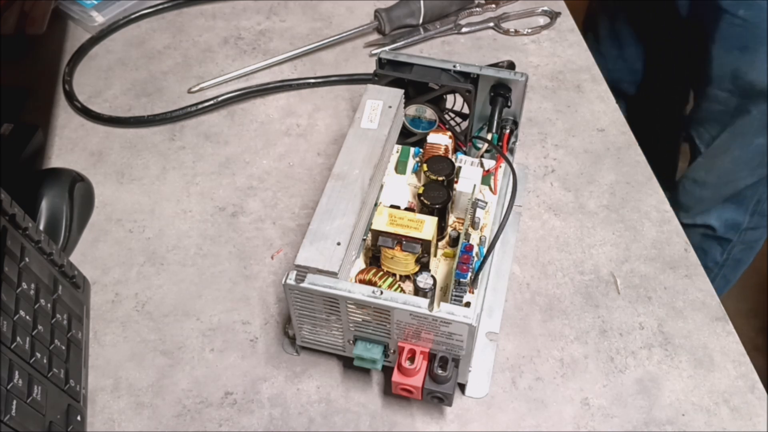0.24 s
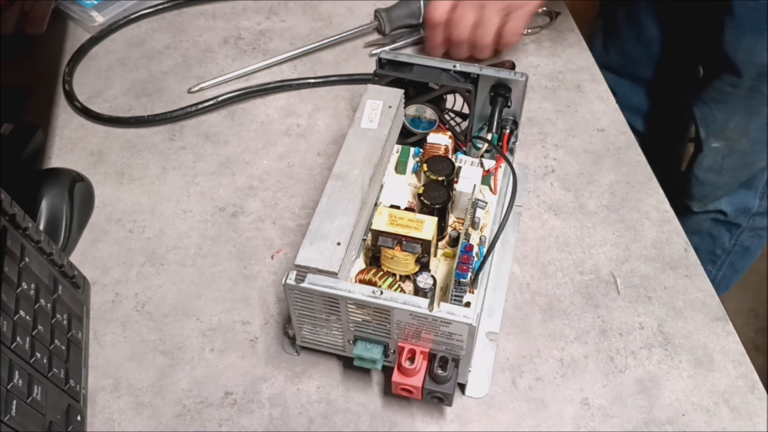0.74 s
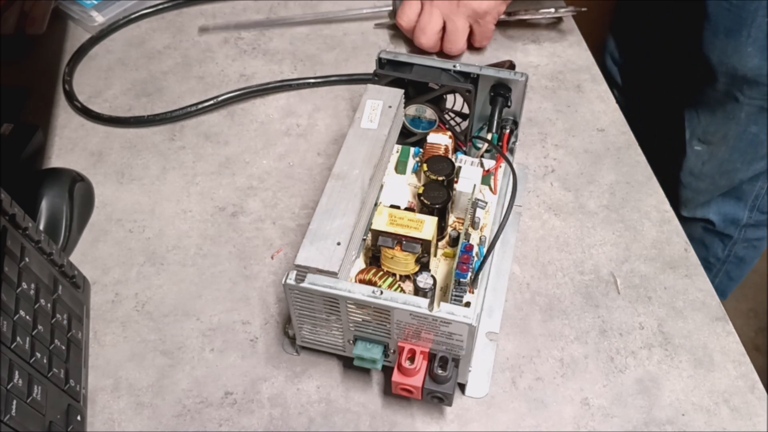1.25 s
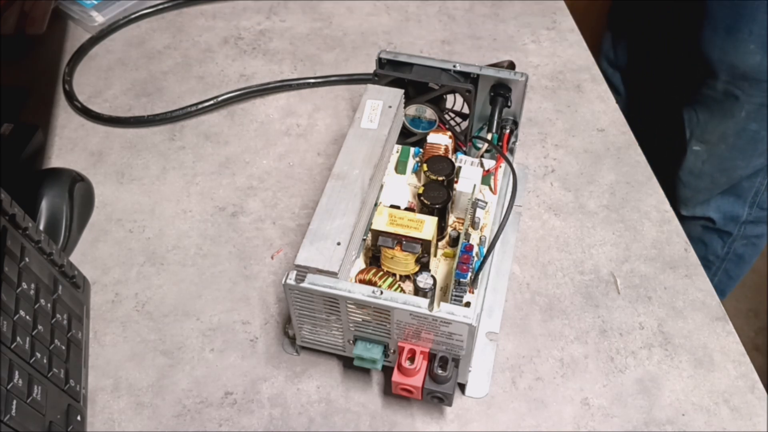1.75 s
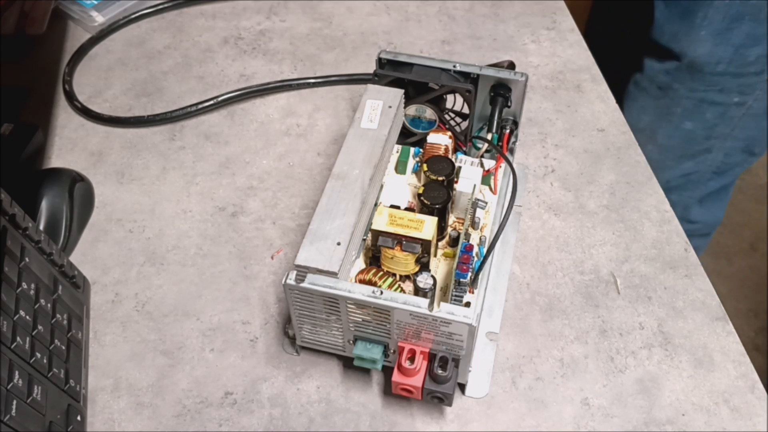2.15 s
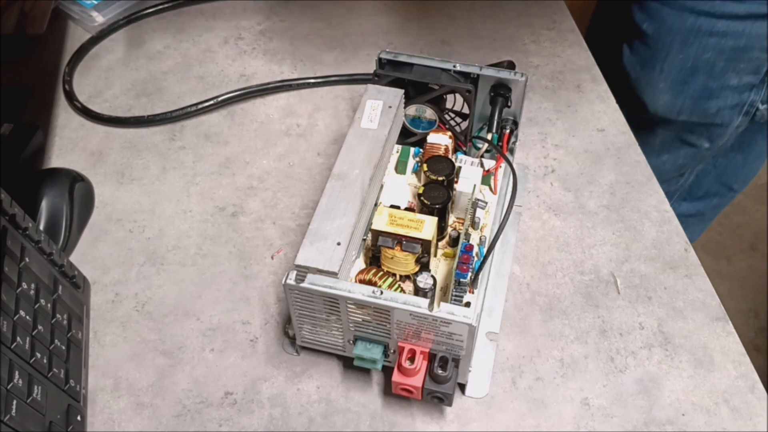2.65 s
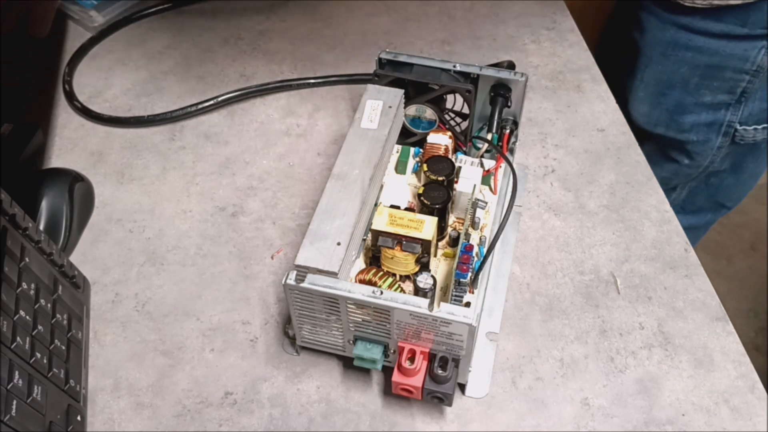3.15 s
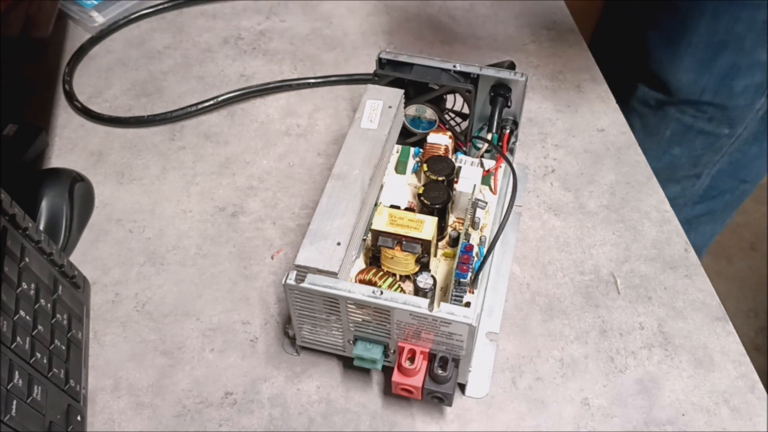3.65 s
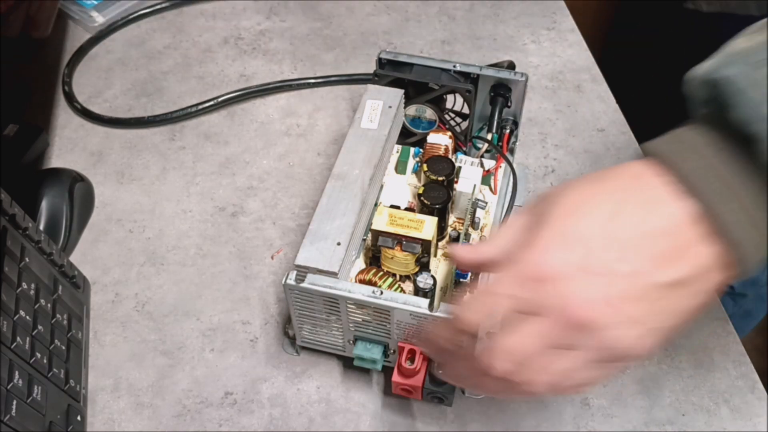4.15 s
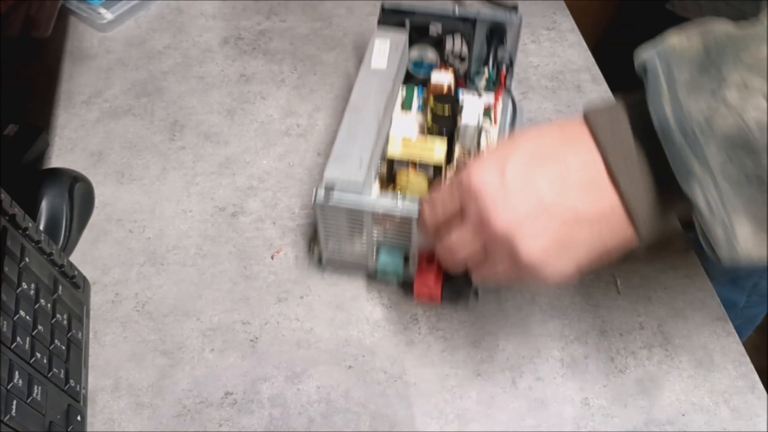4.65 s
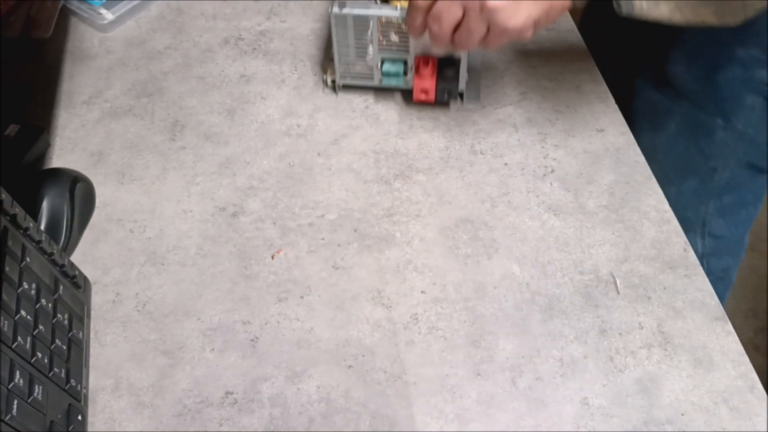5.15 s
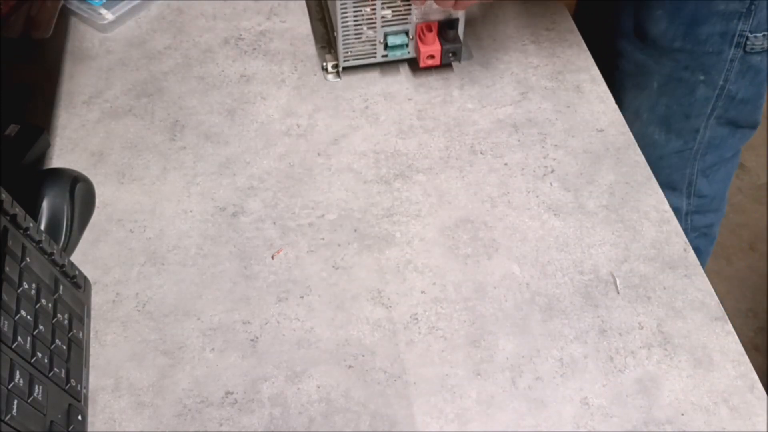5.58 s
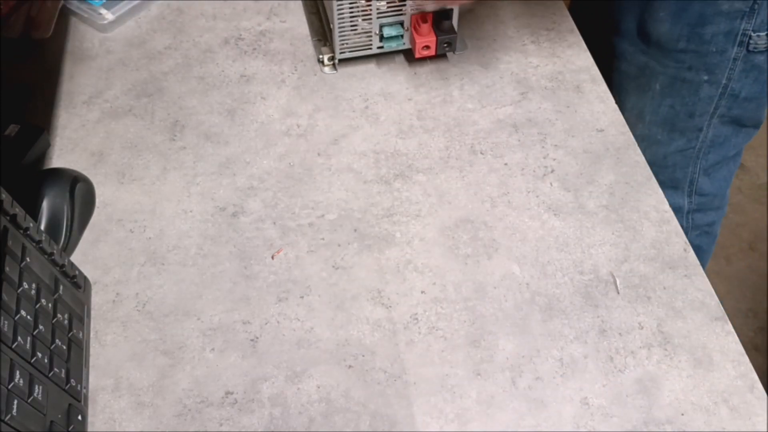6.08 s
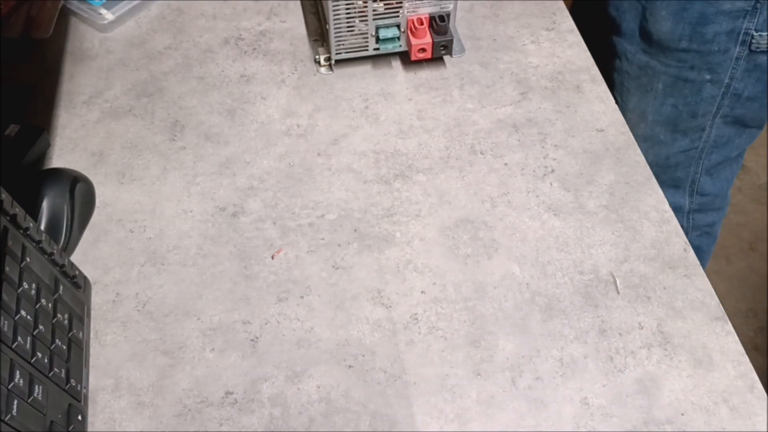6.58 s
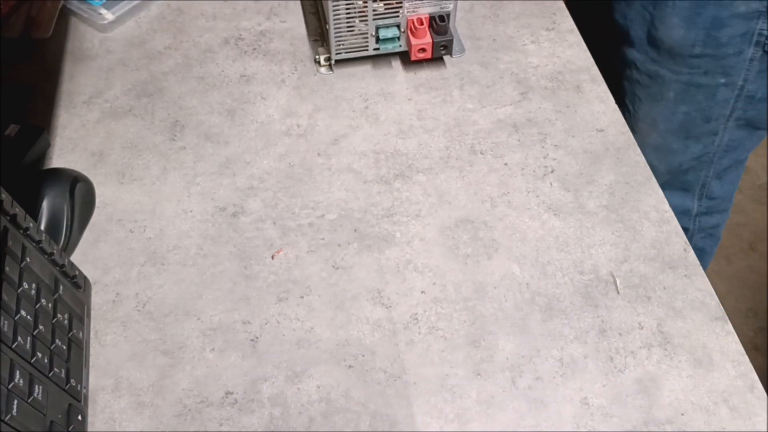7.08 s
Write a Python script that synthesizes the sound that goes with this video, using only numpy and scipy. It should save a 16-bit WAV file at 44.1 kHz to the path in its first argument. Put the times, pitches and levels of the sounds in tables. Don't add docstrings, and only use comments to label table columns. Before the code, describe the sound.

In a small quiet room, steel tools are picked up from a countertop with sharp clinks and handle raps, dragged off, jingled in the hand and dropped clattering into a wooden drawer. After a brief lull, a sheet-metal case ticks and is pushed across the gritty counter in a long squeaky scrape, then nudged. Its cable settles with faint clicks. Close stereo microphones, with a fuller, duller left side.

```python
import sys
import numpy as np
from scipy import signal
from scipy.fft import rfft, irfft, next_fast_len
from scipy.io import wavfile
from scipy.ndimage import uniform_filter1d

SR = 44100
rng = np.random.default_rng(int(sys.argv[2]) if len(sys.argv) > 2 else 0)


def gain_from_db(level_db):
    decades = np.asarray(level_db, float) / 20
    return 10 ** decades


def generate_wav(sig):
    pcm = np.round(np.clip(np.atleast_2d(sig).T, -1, 1) * 32767).astype(np.int16)
    wavfile.write(sys.argv[1], SR, pcm)


N = 322900

# pitch_hz, level_db, t60_s
LONG_TOOL_MODES = [(4300, -9, .04), (4950, -12, .05), (6850, -9, .035), (7671, -11, .07), (8567, -5, .08),
                   (9249, 0, .06), (11200, -12, .04), (12300, -14, .04), (14490, -15, .04)]
SHEARS_MODES = [(1771, -18, .06), (3100, -21, .05), (4963, -15, .06), (6643, -9, .035), (8899, -8, .04),
                (9281, -3, .05), (9420, -4, .05), (9985, -2, .045), (11270, -1, .06), (12220, -8, .04),
                (13085, -16, .04), (14500, -14, .03)]
RACK_MODES = [(800, -15, .07), (2040, -24, .02), (3850, -6, .04), (5814, -4, .04), (6550, -4, .025),
              (7300, -6, .03), (8750, -6, .03), (9400, -2, .03), (10300, -1, .03), (11310, -6, .03)]
CASE_MODES = [(431, -6, .05), (640, -5, .03), (840, -1, .025), (1000, -2, .03), (1250, -1, .022),
              (2130, -13, .04), (2660, -9, .05), (3070, -8, .05), (3790, -7, .05), (4580, -8, .05),
              (7390, -9, .05), (9330, -6, .03), (10100, 0, .03), (11600, -9, .03)]
CABLE_MODES = [(560, -8, .05), (1010, -5, .035), (1370, -8, .035), (2550, -6, .03), (3400, -9, .02),
               (4190, -9, .03), (5800, -6, .03), (7600, -4, .025), (9380, -1, .025), (11640, -7, .03)]
WOOD_MODES = [(446, -18.5, 0.081), (565, 3.5, 0.013), (716, -3, 0.018), (1010, -3, .03), (1217, -4, 0.037),
              (1400, -5.5, 0.019), (1736, -8, 0.036), (1906, -11, 0.036), (2550, -9.5, 0.047),
              (3080, -13, .03)]
THUD_MODES = [(63.54, -13.5, 0.16), (122, -5.5, 0.045), (147, 9, 0.038), (166.7, 6, 0.071),
              (239, -13, 0.08)]

# frequency_hz, density_db
STEEL_CRACK = [(1470, -55.5), (2500, -18), (4990, -8.5), (6570, -6), (9730, 0.5), (11600, 4),
               (15600, -12.5), (16400, -36.5)]
PLASTIC_SNAP = [(700, -12), (3000, -6), (10000, -4), (14000, -22)]
DRAG_SPECTRUM = [(120, -30), (200, -4), (873, -8.5), (1790, -15), (2950, -16.5), (3880, -18), (10500, -17),
                 (16400, -41)]
GRIT_SPECTRUM = [(200, -21.5), (560, -6.5), (1380, 1), (1600, -12.5), (8900, -16.5), (9940, -9.5),
                 (14900, -25.5), (16400, -47)]
AIR_SPECTRUM = [(20, -11.5), (79, -5.5), (114, -0.5), (140, -10.5), (296, -19.5), (4630, -37), (10100, -36),
                (16400, -52)]
FLAT = [(1, 0), (2, 0)]

# frequency_hz, t60_s
ROOM_DECAY = [(100, 0.33), (660, 0.23), (1740, 0.38), (4590, 0.3), (12100, 0.16)]
# frequency_hz, difference_db
PORT_TILT = [(60, 5), (950, 7), (2240, 5), (4300, -3), (8400, -5.5), (9050, -17), (9900, -30), (11200, -38)]
# frequency_hz, likeness
PORT_LIKENESS = [(90, 0.94), (260, 0.82), (520, 0.88), (950, 0.21), (2000, 0.41), (9000, 0.078)]

# start_s, peak_db, ring_hz, ring_over_crack_db, chatter_s
LIFTS = [
    (0.495, -33.5, 11180, 3, 0.02),
    (0.783, -8, 6900, 6, 0.0084),
    (0.83, -4, 9360, 16, 0.0033),
    (0.8893, -13, 9275, 1, 0.0086),
    (1.0165, -23, 7040, -11, 0.003),
    (1.055, -33.5, 6170, -1.5, 0.0081),
]
PULLS = [
    (1.2017, -19, 11760, -6.5, 0.0067),
    (1.215, -15.5, 11270, 5, 0.0061),
    (1.225, -15, 6810, 2.5, 0.008),
]
TOUCHES = [
    (1.672, -11.5, 6550, -12, 0.003),
    (1.781, -20.5, 10350, 1, 0.014),
    (1.803, -27.5, 9800, -16.5, 0.0043),
    (1.849, -18, 10920, 3, 0.011),
    (1.9738, -27, 10560, -2.5, 0.0037),
    (2.136, -49, 10280, 2, 0.02),
]
JINGLES = [(2.371, -25, 10000, 16.5, 0.023), (2.386, -15, 9990, 2, 0.009), (2.463, -27, 10480, 1.5, 0.0065),
           (2.482, -10.5, 11160, 6, 0.006), (2.577, -21, 8940, -6.5, 0.0024),
           (2.588, -12.5, 9400, 0.5, 0.004), (2.675, -26.5, 10130, 6, 0.008),
           (2.7217, -25, 8690, -4, 0.0071), (2.7477, -7.5, 9594, 8.5, 0.003),
           (2.773, -5.5, 11210, 11, 0.006), (2.862, -24, 10050, 4.5, 0.008)]
DROPS = [(2.974, -25, 10170, -1.5, 0.0062), (2.9947, -28, 8980, -8.5, 0.0062),
         (3.03, -13.5, 11260, 0, 0.009), (3.072, -16.5, 10100, 1, 0.01), (3.123, -19, 7140, -9, 0.0064),
         (3.184, -19, 7310, -4.5, 0.016), (3.208, -11, 10820, 2.5, 0.0087), (3.245, -16, 9400, -1, 0.007),
         (3.329, -6, 9680, 5, 0.006), (3.357, -13, 11300, 0.5, 0.01), (3.4156, -11, 9940, -10.5, 0.0072),
         (3.534, -29.5, 9540, 2, 0.007)]
MORE_CLINKS = [(1.257, -24.5, 9900, -2.5, .008), (2.508, -22, 1771, 0.5, .008), (2.95, -37, 9281, -10, .004),
               (3.043, -18, 11270, -2, .005), (3.293, -21.5, 9410, 1, 0.0087),
               (3.397, -20.5, 10010, 5.5, .008), (5.51, -50, 4963, -9, 0.0034), (7.217, -55, 1771, 5, 0.0066)]
TICKS = [
    (4.012, -50, 10100, -7, 0.027),
    (4.0981, -49, 10100, 6, 0.051),
    (4.1864, -33, 10300, -22.5, 0.0047),
    (4.228, -42, 10400, -10, 0.0071),
    (4.3256, -34.5, 11300, -0.5, 0.014),
    (4.3735, -25.5, 10100, -12.5, 0.0026),
    (4.4104, -20, 9400, -4.5, 0.0014),
    (5.32, -37.5, 10700, -9.5, 0.0099),
]
SETTLES = [(5.7189, -31, 3400, -5.5, 0.0031), (5.7744, -47, 1400, 11, 0.0043),
           (5.9953, -39.5, 5800, 2, 0.0042), (6.9272, -42.5, 2740, -13, 0.0037),
           (7.288, -44.5, 6000, -9, 0.008), (7.308, -28, 3910, 1, 0.009)]

# start_s, peak_db, pitch_hz, chatter_s, thud_db
RAPS = [(0.46, -39, 419.6, 0.024, -20.5), (0.505, -34.5, 272.3, 0.0048, -1.5),
        (0.544, -14, 1060, 0.0028, -9), (.628, -32, 1697, 0.014, -21), (0.78, -14, 1800, 0.008, -6),
        (0.819, -14, 454, 0.0013, -16), (0.891, -20, 1400, 0.019, -1), (1.017, -13, 1470, 0.0035, -12),
        (1.054, -20, 1410, 0.037, -26), (1.071, -20.5, 494.7, 0.012, 0), (1.231, -22, 1200, 0.0058, -30)]
BANGS = [(2.166, -28.5, 900, 0.0073, 5), (2.19, -21, 546, 0.014, 3), (2.994, -8, 1142, 0.0027, -25),
         (3.0335, -20, 1300, 0.0039, -20), (3.1647, -26.5, 1842, 0.0054, -20),
         (3.4177, -24, 1640, 0.004, -14), (2.9777, -29, 1814, 0.0036, -20.5),
         (3.073, -22, 1690, 0.0051, -7.5), (3.185, -5.5, 795, 0.0065, 0), (3.209, -21, 328, 0.0033, -12),
         (3.249, -19, 393, 0.0041, -13.5), (3.32, -10, 897, 0.0041, -21), (3.389, -17, 611, 0.0089, 2),
         (3.502, -31.5, 250, 0.0055, 11.5), (3.716, -29.5, 318, 0.0081, -24)]
BUMPS = [(4.016, -30.5, 526, 0.0031, -3.5), (4.185, -30.5, 565, 0.0048, -9), (4.233, -41, 400, .006, -13),
         (4.33, -33, 500, .006, -11.5), (4.68, -48, 600, 0.1, 16), (4.9, -47.5, 807, 0.038, 15),
         (5.709, -38.5, 797, 0.0088, -28), (5.996, -47.5, 1010, 0.0035, -16), (6.012, -55, 1376, 0.0068, 5),
         (7.115, -48, 700, 0.0094, 7.5), (7.217, -42, 477, 0.0036, -1), (7.308, -33, 960, 0.0076, -5)]
THUMP = (3.033, -20, 1700, .006, 12)

# start_s, rise_s, fall_s, peak_db, brightening_db
BRUSHES = [(.33, 0.081, 0.029, -62.5, -4), (.575, 0.078, 0.15, -33, 1.5), (2.165, 0.009, 0.095, -33, -23),
           (2.215, 0.0086, 0.21, -44.5, 0), (3.7, 0.069, 0.1, -46.5, 8.5), (3.98, 0.046, 0.42, -52.5, -8),
           (7.0, 0.43, .03, -54, -7)]

# time_s, pressure_db, brightening_db (sliding speed)
DRAG_OFF = [
    (0.77, -47, -0.5),
    (0.98, -45.5, 4.5),
    (1.144, -35, -6),
    (1.276, -63.5, 7),
    (1.45, -94.5, 1),
]
DRAG_IN = [
    (2.85, -55, -4.5),
    (3.014, -40.5, 11.5),
    (3.163, -37, -1),
    (3.277, -34, 0.5),
    (3.414, -29.5, -1.5),
    (3.697, -49, -7),
]
PUSH = [(4.17, -52.5, 16), (4.32, -40.5, -7.5), (4.388, -33.5, -0.5), (4.632, -35.5, 2), (4.72, -33, 3.5),
        (4.868, -35, 6), (4.95, -32, -1), (5.184, -43.5, 0), (5.28, -51, -1)]
NUDGE = [
    (5.269, -48.5, -2.5),
    (5.31, -48.5, 12.5),
    (5.42, -41.5, 2.5),
    (5.52, -48.5, 0.5),
    (5.6, -63, 4.5),
    (5.706, -61, -4),
]

# start_s, length_s, first_hz, last_hz, level_db
SQUEALS = [(4.37, 0.24, 1180, 1240, -39), (4.38, 0.16, 720, 772, -43.5), (4.466, 0.13, 2712, 2300, -43),
           (4.623, 0.35, 1250, 1260, -35), (4.743, .14, 2070, 2200, -41), (4.79, .12, 2430, 2733, -37),
           (4.744, .13, 3720, 3850, -44.5), (4.77, 0.11, 4700, 4300, -41),
           (4.776, 0.045, 7390, 7500, -38.5), (4.714, 0.047, 10400, 9500, -35.5),
           (4.85, 0.064, 9900, 9950, -32.5), (4.898, 0.19, 980, 993, -44), (4.96, 0.12, 1100, 1000, -40),
           (4.32, .18, 416, 390, -49), (4.66, .2, 440, 400, -52), (4.88, 0.36, 430, 440, -46.5),
           (5.0, .25, 540, 624, -46.5), (5.4, .18, 450, 390, -52.5), (4.68, .35, 132, 134, -50),
           (4.48, .04, 10200, 10200, -34), (4.65, .04, 2000, 2000, -43.5)]
HUMS = [(.62, .07, 1440, 1440, -37.5), (.62, .06, 1760, 1760, -37), (1.06, .14, 2840, 2850, -45),
        (1.78, .07, 800, 850, -54), (1.975, .075, 734, 690, -58), (1.975, .07, 1200, 1300, -58),
        (2.17, .1, 400, 380, -45), (.785, .04, 4300, 4280, -30), (2.3, .1, 124.8, 100, -48.5),
        (2.72, .09, 272.3, 280, -57), (2.86, .1, 120, 115, -40.5), (3.21, .28, 115, 120, -35),
        (3.55, .08, 124.6, 125, -42), (3.1, .07, 7100, 7050, -35), (.63, .06, 3250, 3300, -45),
        (.625, .065, 2930, 2930, -42), (2.17, .09, 135, 130, -33), (2.17, .08, 550, 540, -44),
        (2.17, .05, 1600, 1500, -50), (1.23, .08, 1100, 1050, -36)]
CREEPS = [(5.3, 0.14, 1310, 1400, -42.5), (5.33, 0.15, 2680, 2710, -42.5), (5.38, 0.15, 710, 510, -47),
          (5.55, 0.18, 1290, 1340, -62.5), (5.56, 0.15, 696, 840, -61.5), (5.73, 0.13, 333, 608, -53.5),
          (5.72, 0.12, 3420, 3300, -66.5), (6.05, .12, 680, 700, -70), (5.775, 0.055, 1400, 1400, -56),
          (6.0, 0.13, 1340, 1300, -62.5), (6.02, 0.13, 3800, 3790, -69), (6.05, 0.11, 900, 846, -67),
          (6.94, 0.13, 535, 510, -60), (7.2, 0.11, 500, 476, -51)]
RINGS = [(2.77, .17, 4955, 4945, -36), (2.49, .07, 4950, 4950, -44), (.785, .1, 4950, 4940, -40),
         (.9, .08, 4400, 4380, -40), (1.22, .09, 4960, 4950, -40), (3.04, .12, 1750, 1720, -39),
         (3.2, .1, 2600, 2580, -40), (3.0, .06, 3080, 3070, -40)]

AIR_DB, HISS_DB = -66.5, -99
LEFT_LAG = 50
RUMBLE_HZ, EDGE_HZ = 31.4, 16000
SPREAD_DB, SHIFT_DB, FLUTTER_DB = 2.5, 7, 1.6
TWIN = .4
RISE_SHARE = 0.42
BODY_PER_DB, BODY_PER_RING = -0.5641, -0.77
GRAIN_DB, BOOM_HZ = 2.3, 165
RISE_DB, FALL_DB = -24.5, -31.5
RASP_GAIN, RUMBLE_GAIN = 0.88, 0.092
SING_HZ, SING_SHARE, SING_RISE = 20, .02, .6
RUB_WET_DB, BREAK_DB = -5, 4


def read(points, hz):
    f, value = np.transpose(points)
    return np.interp(np.log(hz + 1), np.log(f + 1), value)


def evened(x):
    return x / np.sqrt(np.mean(x ** 2) + 1e-20)


def peaked(x):
    return x / np.sqrt(uniform_filter1d(x ** 2, 176).max() + 1e-20)


def fade_in(x, samples):
    return x * np.minimum(np.arange(x.shape[-1]) / samples, 1)


def drift(size, span):
    noise = rng.standard_normal(size)
    return evened(uniform_filter1d(uniform_filter1d(noise, span), span))


def add(mix, s, sound):
    part = mix[round(s * SR):][:len(sound)]
    part += sound[:len(part)]


def colour(x, points, lo_hz=0, hi_hz=30000):
    size = next_fast_len(len(x) + 2048)
    hz = np.fft.rfftfreq(size, 1 / SR) + 1
    edges = 1 / ((1 + (lo_hz / hz) ** 10) * (1 + (hz / hi_hz) ** 10))
    return irfft(rfft(x, size) * gain_from_db(read(points, hz)) * edges, size)[:len(x)]


def pair(right, other):
    hz = np.fft.rfftfreq(len(right), 1 / SR)
    like = np.clip(read(PORT_LIKENESS, hz), 0, 1)
    left = irfft(like * rfft(right) + np.sqrt(1 - like ** 2) * rfft(other), len(right))
    left = np.roll(left, LEFT_LAG)
    tilt = gain_from_db(read(PORT_TILT, hz))
    overlap = 2 * like * tilt * np.cos(2 * np.pi * hz * LEFT_LAG / SR)
    shares = np.array([tilt, tilt ** 0]) * 2 / np.sqrt(1 + tilt ** 2 + overlap)
    return irfft(rfft([left, right]) * shares, len(right))


def air():
    noise = [colour(v, AIR_SPECTRUM) for v in rng.standard_normal((2, next_fast_len(N)))]
    both = pair(*noise)[:, :N] * gain_from_db(1.5 * drift(N, 3000))
    hiss = gain_from_db(HISS_DB) * rng.standard_normal((2, N))
    return gain_from_db(AIR_DB) * both / both.mean(0).std() + hiss


def room(x, wet_db, early_db):
    hz, t, z = signal.stft(rng.standard_normal((2, 24000)), SR, nperseg=256)
    decay = gain_from_db(-60 * t / read(ROOM_DECAY, hz)[:, None])
    tail = signal.istft(z * decay, SR, nperseg=256)[1][:, :20480 - 512]
    tail = fade_in(tail, 800)
    paths = gain_from_db(wet_db) * tail / np.linalg.norm(tail[0])
    paths[0, 0] += 1
    paths[0, [37, 95, 170, 290]] += gain_from_db(early_db) * np.array([1, -.8, .6, -.5])
    paths[1, [2, 9, 21, 40, 58, 131, 205]] += np.array([-.4, .5, -.45, .35, .4, -.3, .25])
    paths = pair(*np.pad(paths, ((0, 0), (512, 0))))
    return signal.oaconvolve(x[None], paths, axes=1)[:, 512:N + 512]


def ring(modes, lead_hz=1, lead_db=0, spread_db=0, split=.012):
    hz, db, t60 = np.transpose(modes)[:, :, None]
    lead = lead_db * np.exp(-(np.log(hz / lead_hz) / 0.094) ** 2)
    db = db + spread_db * rng.standard_normal(hz.shape) + lead
    twin = hz * (1 + split * rng.standard_normal(hz.shape))
    t = np.arange(3000) / SR
    waves = np.sin(2 * np.pi * hz * t) + TWIN * np.sin(2 * np.pi * twin * t)
    return (gain_from_db(db - 60 * t / np.clip(t60, .01, .11)) * waves).sum(0)


def chatter(length, lumpy_db):
    t = np.arange(3600) / SR
    lumps = gain_from_db(lumpy_db * rng.standard_normal(len(t) // 60).repeat(60))
    force = rng.standard_normal(len(t)) * lumps
    fall = np.exp(-t / max(length, 3e-4))
    rise = np.minimum(t / max(RISE_SHARE * length, 3e-4), 1)
    return np.pad(force * fall * rise, (0, len(t) // 2))


def struck(force, modes):
    blow = np.concatenate([[0.68 * np.linalg.norm(force)], force[1:]])
    return peaked(signal.fftconvolve(blow, modes)[:len(force)])


def stroke(start, rise, fall, db, bright_db):
    return [(start, db + RISE_DB, bright_db),
            (start + rise, db, bright_db),
            (start + rise + fall, db + FALL_DB, bright_db)]


def rub(rows, spectrum, modes, ring_db, per_s, grain_db, boom_hz, layers_db):
    s, *levels = np.transpose(rows)
    t = np.arange(s[0], s[-1], 1 / SR)
    body_db, bright_db = (np.interp(t, s, c) for c in levels)
    rumble_over, scrape_over, rasp_over = layers_db
    rumble_db = body_db + rumble_over + RUMBLE_GAIN * bright_db
    scrape_db = body_db + scrape_over + bright_db
    rasp_db = body_db + rasp_over + RASP_GAIN * bright_db

    hit, grain = rng.random((len(t), 2)).T
    sizes = gain_from_db(-grain_db * np.log(grain + 0.012))
    grit = (hit < per_s / SR) * sizes * rng.standard_normal(len(t))
    grit *= gain_from_db(FLUTTER_DB * drift(len(t), 250))
    contacts = [grit * gain_from_db(SHIFT_DB * drift(len(t), 1200)) for _ in modes]
    rung = 0
    for contact, mode in zip(contacts, modes):
        response = ring([mode], spread_db=SPREAD_DB, split=0.076)
        rung = rung + signal.oaconvolve(contact, response)[:len(t)]
    wide = evened(grit) + gain_from_db(ring_db) * evened(rung)

    boom = [(boom_hz / 4, -40), (boom_hz / 2, -14), (boom_hz, 0), (boom_hz * 2, -8)]
    sound = gain_from_db(body_db) * evened(colour(wide, spectrum, lo_hz=268, hi_hz=1800))
    sound += gain_from_db(scrape_db) * evened(colour(wide, spectrum, lo_hz=1800, hi_hz=5800))
    sound += gain_from_db(rasp_db) * evened(colour(wide, spectrum, lo_hz=6000))
    sound += gain_from_db(rumble_db) * evened(colour(contacts[0], boom, lo_hz=.55 * boom_hz, hi_hz=244))
    return s[0], sound * signal.windows.tukey(len(t), .08)


def sing(start, length, first_hz, last_hz, db, blur):
    u = np.arange(0, length, 1 / SR) / length
    turn = np.exp(2j * np.pi * np.cumsum(first_hz + (last_hz - first_hz) * u) / SR)
    r = np.exp(-np.pi * (SING_HZ + blur * SING_SHARE * first_hz) / SR)
    noise = rng.standard_normal(SR // 2)[:len(u)]
    tone = (turn * signal.lfilter([1], np.convolve([1, -r], [1, -r]), noise / turn)).real
    breaks = gain_from_db(db + BREAK_DB * drift(SR // 2, 400)[:len(u)])
    return start, breaks * evened(tone) * np.sin(np.pi * u ** SING_RISE)


def knock(row, thud_hz):
    s, db, hz, length, thud_db = row
    force = chatter(length, lumpy_db=4.0)
    slap_spectrum = [(hz / 4, -8), (hz, 0), (hz * 1.69, -8), (hz * 4, -36)]
    slap = peaked(colour(force, slap_spectrum, lo_hz=250, hi_hz=6000))
    panel = struck(force, ring(WOOD_MODES, hz, lead_db=8.0, spread_db=SPREAD_DB))
    panel = colour(panel, FLAT, lo_hz=198, hi_hz=1300 + hz)
    thud = struck(force, ring(THUD_MODES, thud_hz, lead_db=17.0, spread_db=-7.5))
    thud = fade_in(colour(thud, FLAT, lo_hz=0.64 * thud_hz, hi_hz=500), 200)
    return s, fade_in(gain_from_db(db) * (peaked(slap + panel) + gain_from_db(thud_db) * thud), 40)


def clink(row, modes, body_db, spectrum):
    s, db, hz, ring_db, length = row
    force = chatter(length, lumpy_db=4.5)
    crack = peaked(colour(force, spectrum, lo_hz=0.65 * spectrum[0][0]))
    steel = struck(force, ring(modes, hz, lead_db=11.5, spread_db=SPREAD_DB))
    steel = colour(steel, FLAT, lo_hz=0.96 * modes[0][0])
    body = peaked(colour(force, DRAG_SPECTRUM, lo_hz=1220, hi_hz=4000))
    body_db = body_db + BODY_PER_DB * (db + 29.5) + BODY_PER_RING * ring_db
    return s, gain_from_db(db) * (peaked(crack + gain_from_db(ring_db) * steel) + gain_from_db(body_db) * body)


def scene():
    steel, blows, rubs = np.zeros((3, N))

    for row in BRUSHES:
        add(rubs, *rub(stroke(*row), DRAG_SPECTRUM, RACK_MODES, ring_db=-17.5, per_s=8100, grain_db=0.4,
                       boom_hz=124.1, layers_db=(-9, -6, -9)))
    for rows in DRAG_OFF, DRAG_IN:
        add(rubs, *rub(rows, DRAG_SPECTRUM, WOOD_MODES[::2] + SHEARS_MODES[::2], ring_db=-16.5, per_s=5600,
                       grain_db=3.0, boom_hz=BOOM_HZ, layers_db=(-4, -8, -6)))
    for rows in PUSH, NUDGE:
        add(rubs, *rub(rows, GRIT_SPECTRUM, CASE_MODES, ring_db=-13.5, per_s=8000, grain_db=GRAIN_DB,
                       boom_hz=67.5, layers_db=(-26, -5, -4)))
    for rows, blur in (SQUEALS, 1), (HUMS, 2.2), (RINGS, .2), (CREEPS, 5):
        for row in rows:
            add(rubs, *sing(*row, blur))

    for rows, thud_hz in (RAPS, 172), (BANGS, 150), (BUMPS, 62), ([THUMP], 180):
        for row in rows:
            add(blows, *knock(row, thud_hz))

    for rows, modes, body_db, crack in [(LIFTS, LONG_TOOL_MODES, -13, STEEL_CRACK),
                                        (PULLS, SHEARS_MODES, -22, STEEL_CRACK),
                                        (TOUCHES, RACK_MODES, -21, STEEL_CRACK),
                                        (JINGLES, SHEARS_MODES, -28, STEEL_CRACK),
                                        (DROPS, SHEARS_MODES, -13, STEEL_CRACK),
                                        (MORE_CLINKS, SHEARS_MODES, -15, STEEL_CRACK),
                                        (TICKS, CASE_MODES, -17, STEEL_CRACK),
                                        (SETTLES, CABLE_MODES, -25, PLASTIC_SNAP)]:
        for row in rows:
            add(steel, *clink(row, modes, body_db, crack))

    places = [(steel, -6), (blows, -5), (rubs, RUB_WET_DB)]
    heard = sum(room(x, wet_db, early_db=-7.5) for x, wet_db in places)
    return gain_from_db(-6.0) * heard + air()


def top_cut(x):
    return signal.sosfilt(signal.butter(12, 16500, fs=SR, output="sos"), x)


def record(dry):
    rolled = signal.sosfilt(signal.butter(2, RUMBLE_HZ, "high", fs=SR, output="sos"), dry)
    limited = rolled / (1 + rolled ** 4) ** .25
    low_pass = signal.firwin(255, EDGE_HZ, window=("kaiser", 8), fs=SR)
    mix = signal.oaconvolve(limited, low_pass[None], "same")
    return top_cut(mix)


dry = scene()
out = record(dry)
generate_wav(out)
```